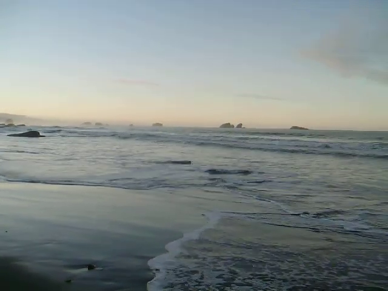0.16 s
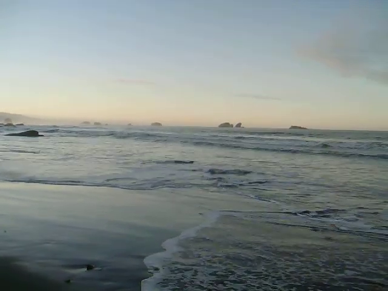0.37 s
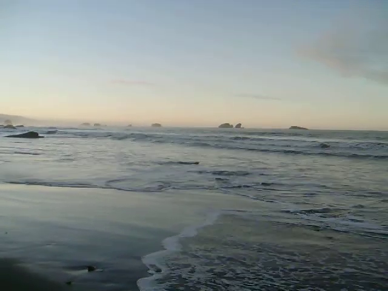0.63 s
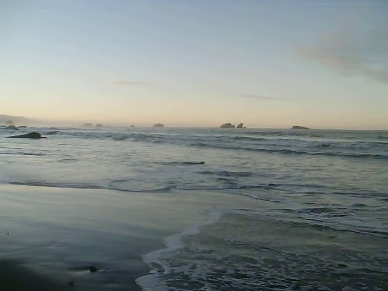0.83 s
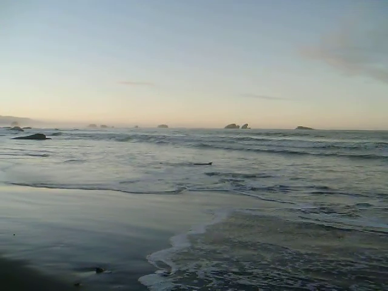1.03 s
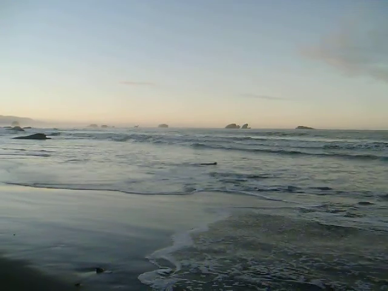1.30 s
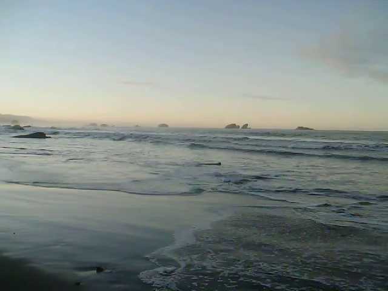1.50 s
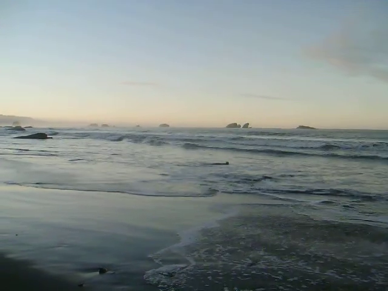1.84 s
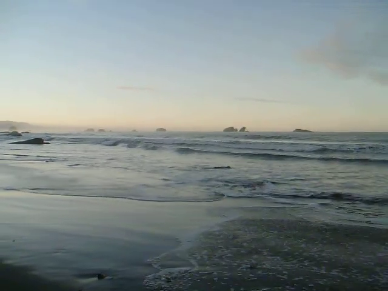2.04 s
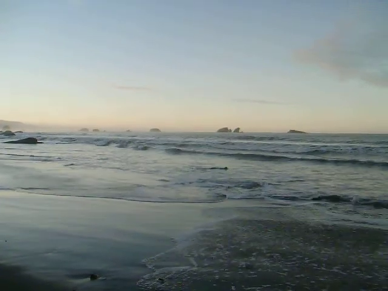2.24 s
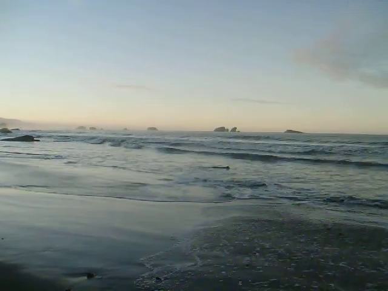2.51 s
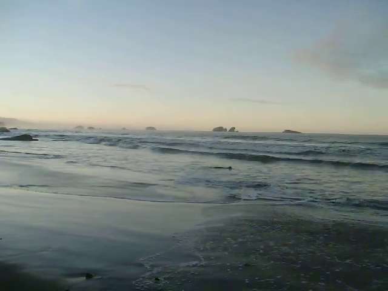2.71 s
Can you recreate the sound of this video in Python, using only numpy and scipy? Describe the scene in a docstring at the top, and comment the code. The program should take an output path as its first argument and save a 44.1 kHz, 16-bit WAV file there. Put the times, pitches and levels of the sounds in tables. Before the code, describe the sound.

Steady full roar of ocean surf on an open beach, with faint fizzing foam and ticks

```python
"""Surf on a wide open beach

Far breakers merge into a smooth roar, with a wash and a hiss above it: coloured noise that rises and falls.
Nearby foam adds small ringing bubbles and a few clear ones that rise in pitch.
Small ticks ring the cavity in front of the small microphone of a hand-held camera.
The loudest peaks overload the recorder, which flattens them and dulls the treble."""
import sys
import numpy as np
from scipy import signal
from scipy.fft import rfft, irfft, next_fast_len
from scipy.io import wavfile

SR = 44100
rng = np.random.default_rng(int(sys.argv[2]) if len(sys.argv) > 2 else 0)


def transcribe(u):
    """Save the signal u as a 16-bit wav file named by the first command-line argument.

    u: samples, shape (n,) or (channels, n), limited to [-1, 1]; the rate is SR.
    q: integer samples, one column per channel.
    """
    v = np.clip(np.atleast_2d(u).T, -1, 1)
    q = np.round(v * 32767).astype(np.int16)
    wavfile.write(sys.argv[1], SR, q)


N = 126126   # length [samples]

# how the surf rises and falls; only the change around each column's mean is used:
# (time [s], rumble [dB], roar [dB], wash [dB], hiss [dB])
SURF_SWELL = [(0.1, -27.5, -13.5, -26.5, -37), (0.4, -25, -15, -25.5, -36), (0.7, -27.5, -15.5, -25.5, -37),
              (1.0, -26.5, -14, -26.5, -36), (1.2, -26.0, -13.5, -24.5, -35), (1.35, -25, -12.5, -25, -36),
              (1.55, -25, -13, -25.5, -34.5), (1.75, -23.7, -12, -24.5, -33),
              (1.95, -24.5, -12, -24.1, -33.1), (2.1, -26, -11.5, -24.5, -33.5),
              (2.3, -24.5, -13.5, -26.5, -34.5), (2.45, -26.5, -15, -24, -34.5),
              (2.6, -25.5, -11.5, -22.5, -32.5), (2.76, -22.5, -13, -23.6, -33)]
# middle of the rumble, roar, wash and hiss: (frequency [Hz])
REGION_CENTRES = [150, 550, 1500, 3500]
# average colour of the surf at the microphone: (frequency [Hz], relative level per Hz [dB])
SURF_COLOUR = [(25, -33), (54, -25.5), (169, -7.5), (309, -5), (575, -0.7), (794, -4), (933, -6.5),
               (1120, -15), (1380, -13.5), (1700, -19.5), (2190, -22.5), (2760, -21.5), (3250, -28),
               (4200, -29.5), (5300, -33), (6500, -35.5)]
# single ticks that ring the cavity: (time [s], rough peak level [dB])
CLEAR_TICKS = [(0.0917, -15), (0.8265, -16), (1.01, -24), (1.1416, -14.5), (2.6983, -29), (2.831, -20)]
# clear bubbles: (time [s], starting pitch [Hz], peak level [dB], length [s])
CLEAR_BUBBLES = [(2.553, 1930, -23, .034), (2.763, 2060, -24, .018)]

CAVITY_HZ, CAVITY_T60_S = 2677, .017   # T60: time to fade by 60 dB
TICK_SOFTENING_S = .0006               # how gently a tick sets in
FAINT_TICKS_PER_S, FAINT_TICK_DB, FAINT_TICK_SPREAD_DB = 54, -34, 5.5
FOAM_PER_S, FOAM_SMALLEST_DB = 210, -40
FOAM_CYCLES = 25.0     # swings while a bubble fades by 60 dB
BUBBLE_RISE = 0.11     # share of pitch gained over a clear bubble's life
SURF_DB = -12.5        # average (RMS) level
PATCHY_DB, PATCH_RATE_HZ = 0.6, 2.6        # slow wander, partly shared by neighbouring bands
FLICKER_DB, FLICKER_RATE_HZ = 0.25, 17     # quick wander, separate in each band
INPUT_CEILING, SECOND_CEILING = 0.74, 0.73   # full scale is 1
INPUT_CUT_HZ, INPUT_CUT_DEPTH_DB = 6266, 56
TOP_CUTOFF_HZ = 15800


def from_db(db):
    """Turn decibels into a plain multiplier."""
    return 10 ** (np.asarray(db) / 20)


def rms_one(x):
    """Scale a signal to an RMS level of 1."""
    return x / np.sqrt(np.mean(x ** 2) + 1e-20)


def drift(rate_hz):
    """Smooth noise into a random wander of spread 1; a higher rate wanders faster."""
    step = 40   # one point per 40 samples is enough
    r = np.exp(-2 * step * np.pi * rate_hz / SR)
    noise = rng.standard_normal(N // step + 2002)
    slow = signal.lfilter([1], [1, -2 * r, r * r], noise)[2000:]   # skip the filter's start
    slow = rms_one(slow - slow.mean())
    return np.interp(np.arange(N) / step, np.arange(len(slow)), slow)


def ring(clicks, hz, t60):
    """A click sets a resonance ringing: a unit click gives a fading sine of starting height 1."""
    r = from_db(-60 / (t60 * SR))   # fade per sample
    w = 2 * np.pi * hz / SR
    return signal.lfilter([0, np.sin(w)], [1, -2 * r * np.cos(w), r * r], clicks + 1e-18)


def ticks():
    """Short soft knocks make the air in front of the microphone ring at the cavity's own pitch."""
    happens = rng.random(N) < FAINT_TICKS_PER_S / SR
    clicks = from_db(FAINT_TICK_DB + rng.normal(0, FAINT_TICK_SPREAD_DB, N)) * happens
    for start, db in CLEAR_TICKS:
        clicks[int(start * SR)] = from_db(db)
    # a first, very short ring softens the onset of the second
    soft = ring(clicks, CAVITY_HZ, 7 * TICK_SOFTENING_S) / (SR * TICK_SOFTENING_S / 3)
    return ring(soft, CAVITY_HZ, CAVITY_T60_S)


def small_bubbles():
    """Small near bubbles ring briefly, each at one of 16 pitches."""
    happens = rng.random(N) < FOAM_PER_S / SR
    extra_db = 4.0 * np.minimum(rng.exponential(1, N), 3)
    clicks = from_db(FOAM_SMALLEST_DB + extra_db) * happens
    pitches = np.geomspace(1100, 3200, 16)
    choice = rng.integers(0, 16, N)
    return sum(ring(clicks * (choice == k), hz, FOAM_CYCLES / hz) for k, hz in enumerate(pitches))


def clear_bubbles():
    """A few clear bubbles swell, fade and rise in pitch as they burst."""
    out = np.zeros(N)
    for start, hz, db, length in CLEAR_BUBBLES:
        t = np.clip(np.arange(N) / SR - start, 0, length)
        swell = np.sin(np.pi * t / length)
        cycles = hz * t * (1 + BUBBLE_RISE * t / length / 2)
        out += from_db(db) * swell * np.sin(2 * np.pi * cycles)
    return out


def surf():
    """Countless bursting bubbles blur to noise, whose overlapping bands rise, fall and wander."""
    size = next_fast_len(N)
    log_hz = np.log(np.arange(size // 2 + 1) * SR / size + 1)   # +1 avoids log(0)
    colour, swell = np.array(SURF_COLOUR), np.array(SURF_SWELL)
    colour_db = np.interp(log_hz, np.log(colour[:, 0]), colour[:, 1])
    spectrum = rfft(rng.standard_normal(size)) * from_db(colour_db)
    swing = swell[:, 1:] - swell[:, 1:].mean(axis=0)
    centres = np.log(np.geomspace(40, 6000, 20))
    out, patchy = 0, drift(PATCH_RATE_HZ)
    for k, centre in enumerate(centres):
        # each band fades into its neighbours
        weight = np.interp(log_hz, centres, np.arange(len(centres)) == k)
        band = irfft(spectrum * weight, size)[:N]
        curve = [np.interp(centre, np.log(REGION_CENTRES), row) for row in swing]
        swell_db = np.interp(np.arange(N) / SR, swell[:, 0], curve)
        # keep part of the wander from the band below
        patchy = .7 * patchy + .7 * drift(PATCH_RATE_HZ)
        wander_db = PATCHY_DB * patchy + FLICKER_DB * drift(FLICKER_RATE_HZ)
        out = out + band * from_db(swell_db + wander_db)
    return from_db(SURF_DB) * rms_one(out)


def scene():
    """Add the ticks, the foam's bubbles and the surf into one channel."""
    return (ticks() + small_bubbles() + clear_bubbles() + surf())[None]


def record(dry):
    """The input overloads and is dulled; a second ceiling clips what still peaks, then the top is cut."""
    out = np.clip(dry, -INPUT_CEILING, INPUT_CEILING)
    for cut_hz in (INPUT_CUT_HZ, INPUT_CUT_HZ * 1.15):
        dulling = signal.cheby2(14, INPUT_CUT_DEPTH_DB, cut_hz, fs=SR, output="sos")
        out = signal.sosfilt(dulling, out)
    out = np.clip(out, -SECOND_CEILING, SECOND_CEILING)
    top_cut = signal.ellip(10, .1, 70, TOP_CUTOFF_HZ, fs=SR, output="sos")
    return signal.sosfilt(top_cut, out)


dry = scene()
out = record(dry)
transcribe(out)
```